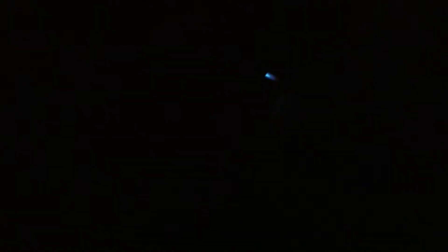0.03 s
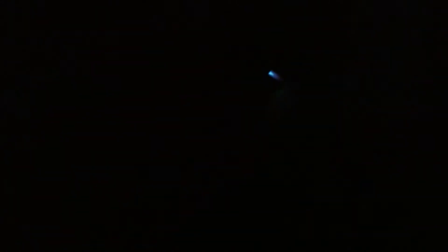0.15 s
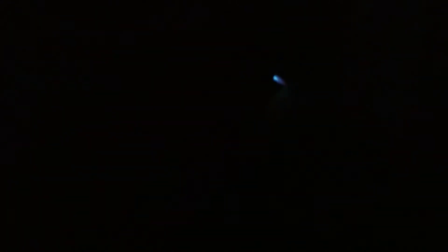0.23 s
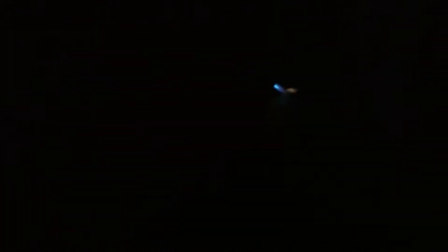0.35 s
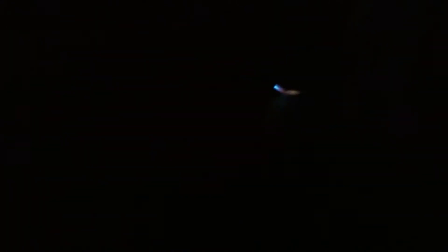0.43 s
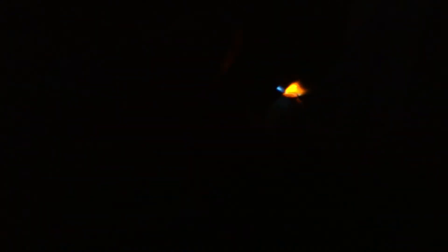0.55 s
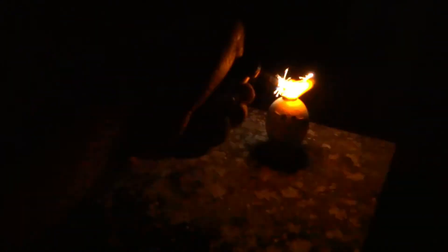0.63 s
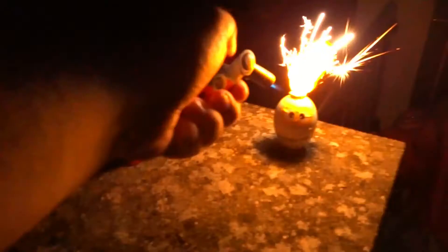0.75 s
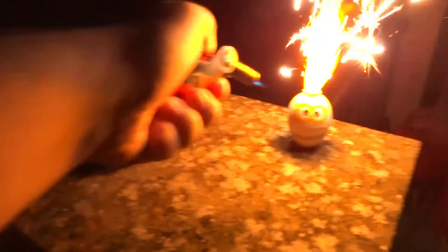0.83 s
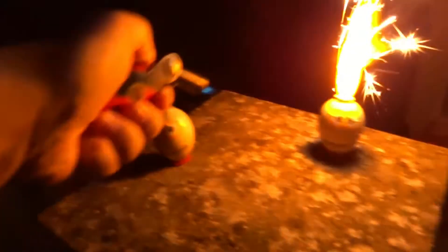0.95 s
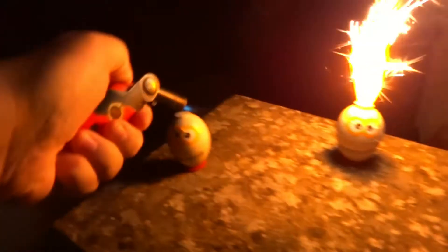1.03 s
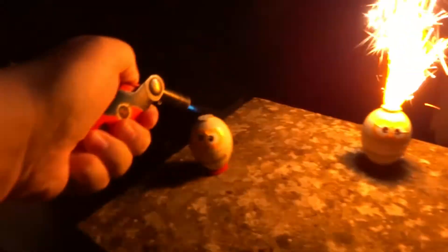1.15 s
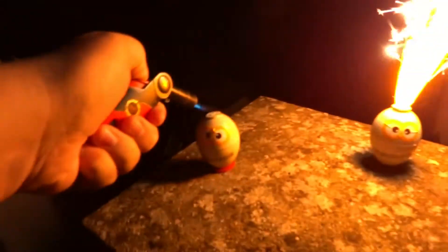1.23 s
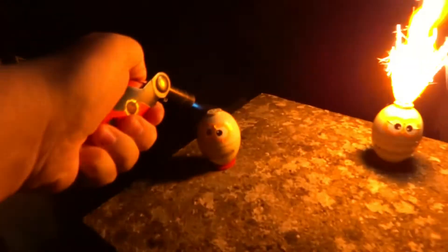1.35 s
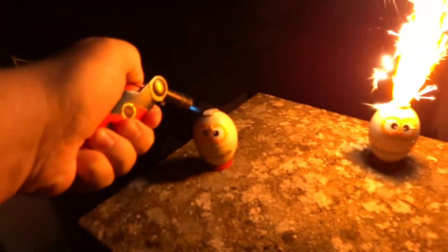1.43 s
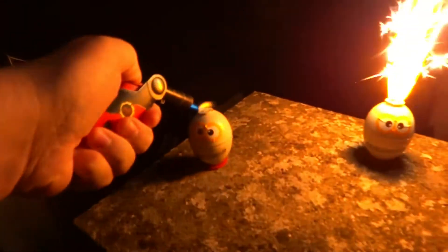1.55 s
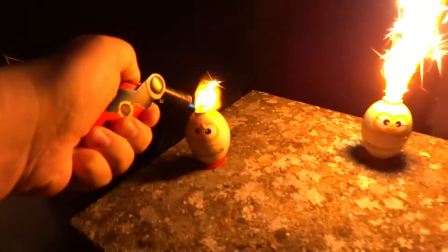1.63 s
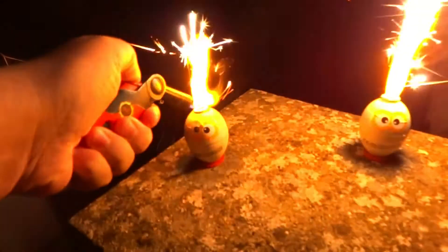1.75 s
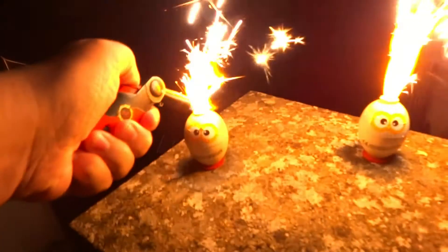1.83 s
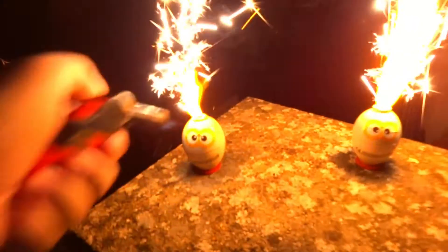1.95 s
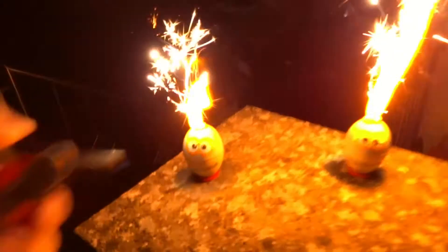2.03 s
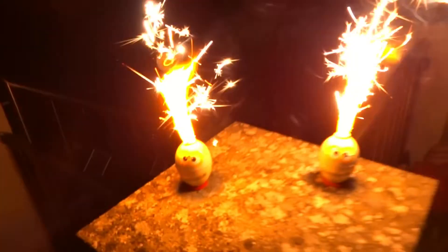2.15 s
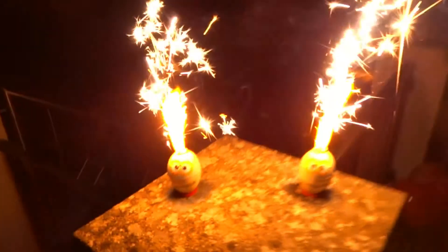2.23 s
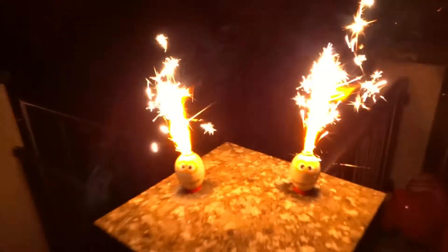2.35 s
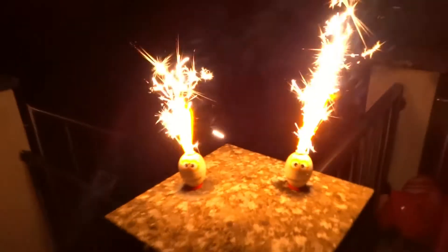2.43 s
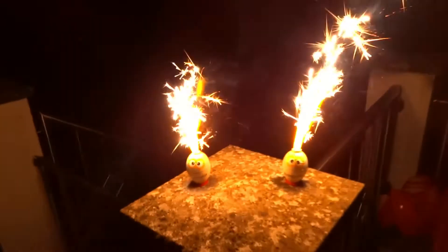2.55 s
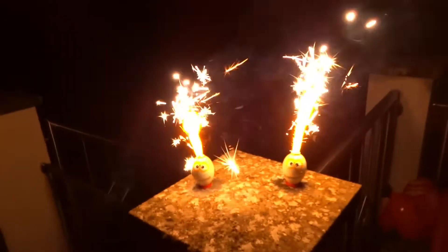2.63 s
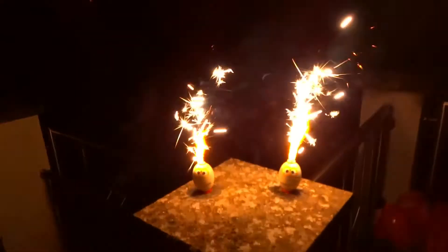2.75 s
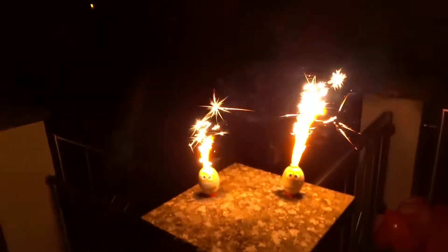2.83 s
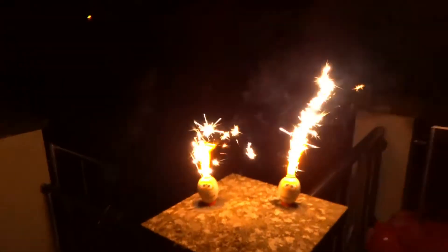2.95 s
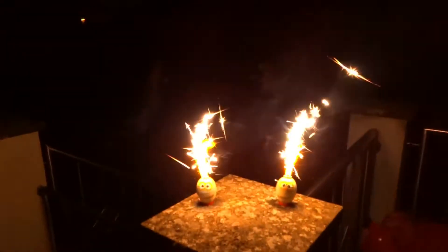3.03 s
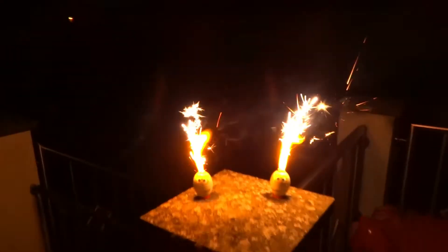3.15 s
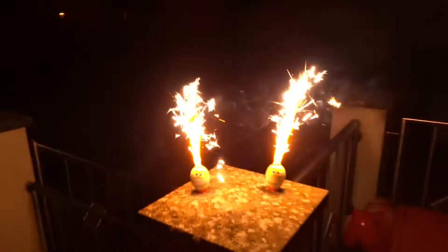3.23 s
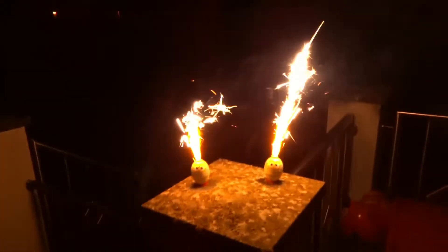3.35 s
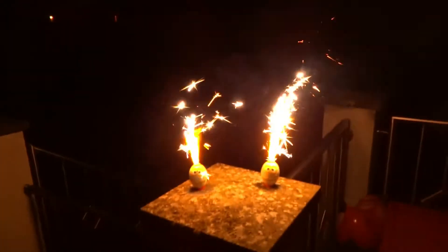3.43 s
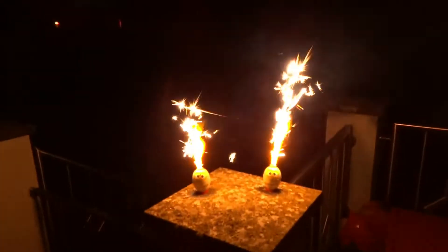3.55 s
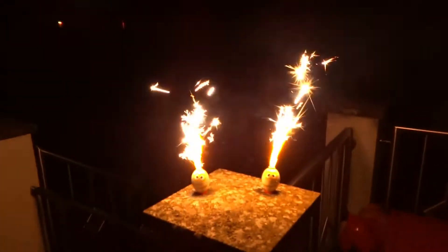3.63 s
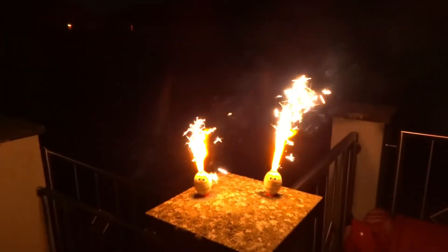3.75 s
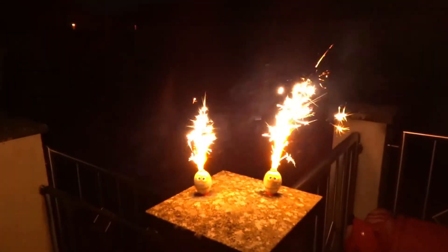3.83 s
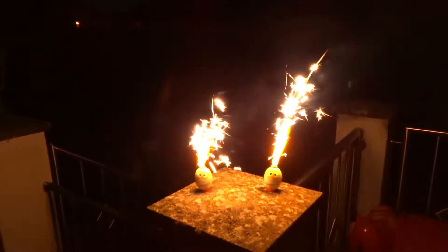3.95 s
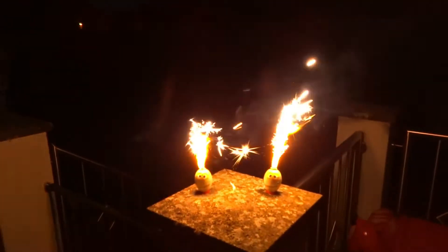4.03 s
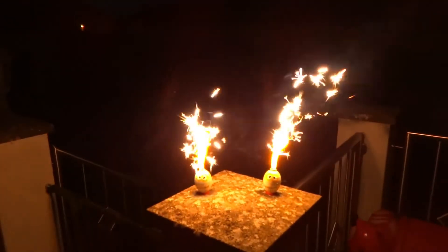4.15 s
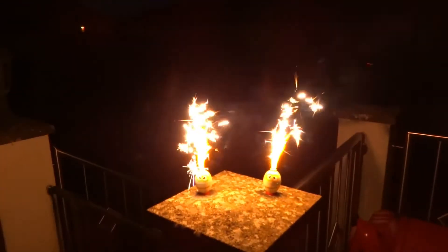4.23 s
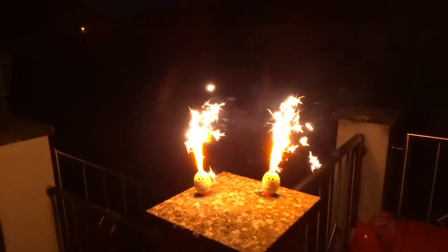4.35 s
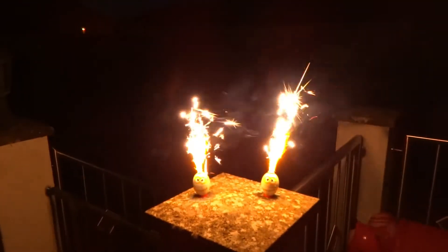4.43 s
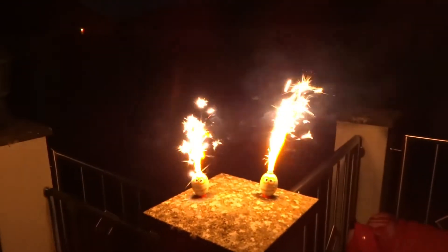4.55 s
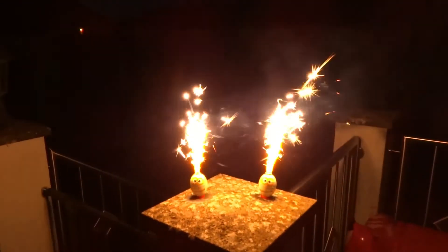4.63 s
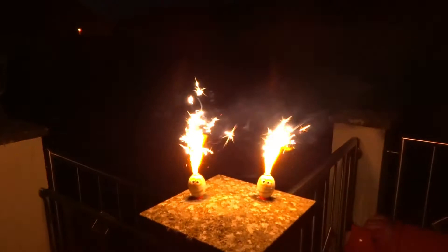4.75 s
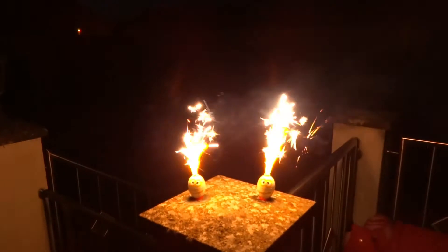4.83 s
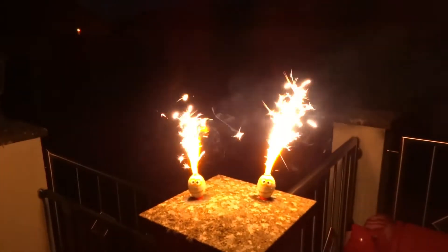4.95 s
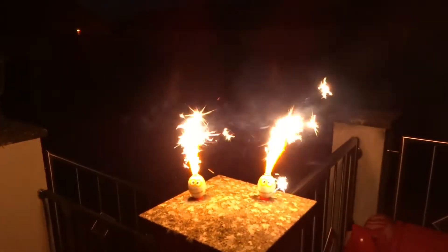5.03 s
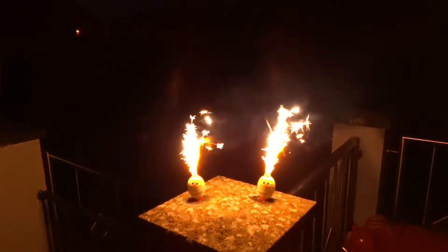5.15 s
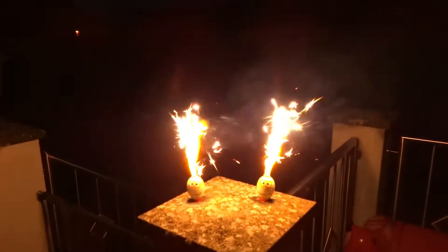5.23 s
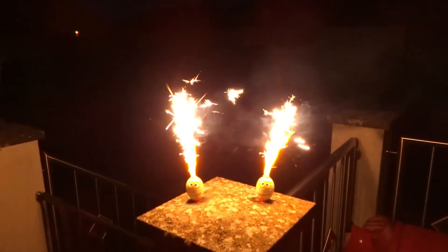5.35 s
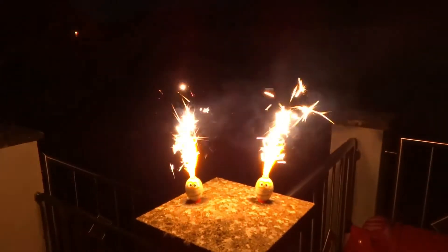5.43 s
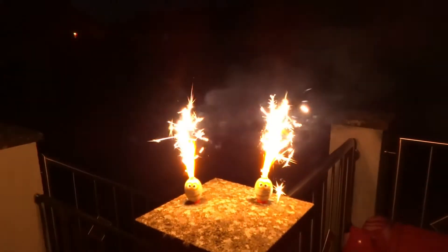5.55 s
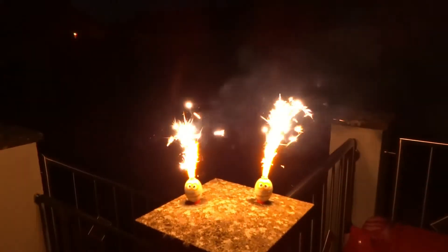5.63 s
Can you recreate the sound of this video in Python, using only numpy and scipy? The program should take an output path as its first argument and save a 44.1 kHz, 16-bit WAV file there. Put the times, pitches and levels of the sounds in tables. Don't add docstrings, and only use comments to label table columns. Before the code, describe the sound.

Quiet torch hiss, a quick fuse whoosh, then fierce sizzling spark jets that crackle and snap steadily until the end.

```python
import sys
import numpy as np
from scipy import signal
from scipy.fft import rfft, irfft, next_fast_len
from scipy.io import wavfile
from scipy.ndimage import map_coordinates

SR = 44100
rng = np.random.default_rng(int(sys.argv[2]) if len(sys.argv) > 2 else 0)


def gain_from_decibels(decibels):
    exponent = np.asarray(decibels, float) / 20
    return 10 ** exponent


def wav_out(sig):
    wavfile.write(sys.argv[1], SR, np.round(np.clip(np.atleast_2d(sig).T, -1, 1) * 32767).astype(np.int16))


N = 251370


def unit(x):
    return x / np.sqrt(np.mean(x ** 2) + 1e-20)


def in_time(rows):
    s, *columns = np.transpose(rows)
    return [np.interp(np.arange(N) / SR, s, column) for column in columns]


def coloured(x, spectrum):
    size = next_fast_len(N + 4096)
    hz = np.maximum(np.arange(size // 2 + 1) * SR / size, 1)
    table_hz, table_db = np.transpose(spectrum)
    log_gain = np.interp(np.log(hz), np.log(table_hz), table_db) * np.log(10) / 20
    cepstrum = irfft(log_gain, size)
    cepstrum[1:size // 2] *= 2
    cepstrum[size // 2 + 1:] = 0
    response = np.exp(rfft(cepstrum))
    return irfft(rfft(x, size) * response, size)[..., :N]


def drift(rate_hz):
    r = np.exp(-2 * np.pi * rate_hz / SR)
    wander = signal.lfilter([1], [1, -2 * r, r * r], rng.standard_normal(N + SR))
    return unit(wander[SR:])


def panned(x, pan_db):
    return x * gain_from_decibels(np.array([[.5], [-.5]]) * pan_db)


def bumps(s, half_s):
    return np.exp(-.5 * ((np.arange(N) / SR - s[:, None]) / half_s[:, None]) ** 2)


PART_EDGES_HZ = (30000, 11000, 6000, 1200, 1)


def band(x, index):
    hz = np.maximum(np.fft.rfftfreq(N, 1 / SR), 1)
    upper, lower = (1 / (1 + (hz / edge_hz) ** 6) for edge_hz in PART_EDGES_HZ[index:index + 2])
    return irfft(rfft(x) * (upper - lower), N)


# (time [s], hiss level [dB], flame roar level [dB], echo delay off the hand [ms])
TORCH_MOVES = [(0, -47.5, -55, .345), (.1, -48, -56.5, 0.31), (.2, -49, -54.5, .3), (.3, -47.5, -53, 0.292),
               (.45, -47, -53.5, 0.297), (.6, -44, -52, 0.285), (.8, -49, -53, 0.3), (1.9, -47, -82, 0.14),
               (2.2, -58, -57, 0.24)]
# (frequency [Hz], level per Hz [dB])
TORCH_HISS_COLOUR = [(1200, -29), (2200, -9.5), (3500, -15), (5000, -20), (7500, -23.5), (10000, -6.5),
                     (13400, 3.5), (14600, -10), (15900, -13)]
# (frequency [Hz], level per Hz [dB])
TORCH_ROAR_COLOUR = [(35, -58), (260, -18.5), (425, -17), (590, -3.5), (710, -1), (1100, -11), (1700, -18),
                     (4000, -29.5)]


def torch():
    hiss_db, roar_db, echo_ms = in_time(TORCH_MOVES)
    white = rng.standard_normal((4, N))
    gas = coloured(white[0], TORCH_HISS_COLOUR)
    echo = map_coordinates(gas, [np.arange(N) - echo_ms * SR / 1000], order=3, mode="nearest")
    hiss = gain_from_decibels(hiss_db + .8 * drift(20)) * unit(gas + .72 * echo)
    roar = gain_from_decibels(roar_db + 1.24 * drift(14)) * unit(coloured(white[1], TORCH_ROAR_COLOUR))
    spill_colour = [(1200, -7), (2500, 0), (4200, -4), (5200, -38)]
    spill = gain_from_decibels(hiss_db - 23) * unit(coloured(white[2], spill_colour))
    wide_roar = gain_from_decibels(roar_db - 11) * unit(coloured(white[3], TORCH_ROAR_COLOUR))
    return hiss + roar + (spill + wide_roar) * [[1], [-1]]


BURN_AND_FACING = [(.7, -14.5, -8), (.73, -12, -8), (.76, -3, -1), (.82, -1, -2), (1.1, 1.5, -9),
                   (1.5, 1.5, -16), (1.75, 2, -8), (2.0, 3, -4), (2.5, 2.5, -0.5), (2.9, 0.5, 0.5),
                   (3.5, -.5, 0), (4.2, -1, 0.5), (5.0, 0.5, 1.5), (5.7, -.5, 1.5)]
# (time [s], level [dB], half length [s])
SURGES_AND_LULLS = [(0.944, -3, .03), (1.032, 1.5, .04), (1.2, -3, .03), (1.35, -2.5, .04),
                    (1.62, 1.5, .04), (1.78, -2.5, .03), (1.93, 2.5, .05), (2.08, -3, .03),
                    (2.281, -1.5, .03), (2.527, 2.5, .05), (2.739, 2.5, .03), (2.809, -3, .03),
                    (3.052, 1.5, .03), (3.13, -5.5, .04), (3.28, 1.5, .06), (3.581, -2.5, .04),
                    (3.79, -1.5, .03), (3.891, 3, .04), (3.986, -2.5, .03), (4.181, -1.5, .05),
                    (4.567, 3, .06), (4.75, -3, .04), (4.897, 3.5, .05), (5.166, -3, .04), (5.31, 4, .05),
                    (5.481, -2, .04), (5.6, 1.5, .05)]


def vigour():
    burn_db, facing_db = in_time(BURN_AND_FACING)
    s, db, half_s = np.transpose(SURGES_AND_LULLS)
    return burn_db, db @ bumps(s, half_s), facing_db


# (time [s], first fountain left-right [dB],
# second fountain left-right [dB], second fountain's share [0-1], nearness [dB])
FOUNTAIN_BEARINGS = [(.6, -1, -5, 0.01, 1), (.9, -1.8, -4, 0.01, 0), (1.0, -2.5, -5, 0.09, -6),
                     (1.3, -3, -6, 0, -0.5), (1.75, -3, 4, 0, -2), (1.85, -2.5, -1.5, 0, 3),
                     (2.5, -3, 0, 0.7, -3.5), (3.5, -2, 0.2, 0.73, -9), (5.7, -1, 0, 0.5, -5)]


def bearings():
    return in_time(FOUNTAIN_BEARINGS)


def crackle(per_s, spread_db, most_db):
    born = rng.random(N) < per_s * gain_from_decibels(3.0 * drift(25)) / SR
    size = gain_from_decibels(np.minimum(spread_db * rng.exponential(1, N), most_db))
    push = rng.choice([1, -1], N, p=[.8, .2])
    return unit(born * size * push)


# (frequency [Hz], level per Hz [dB])
JET_SPECTRUM = [(40, -56), (150, -27.5), (310, -17.5), (410, -17), (650, -6.5), (950, -11), (1600, -8),
                (3100, -4), (5500, -7.5), (8000, -4.5), (11000, 1), (13600, 2.5), (14600, -6), (16000, -13)]
# (frequency [Hz], side over mid level [dB])
SURROUNDINGS = [(60, -8), (110, -11), (200, -15), (380, -16), (700, -19), (1290, -19), (2380, -20),
                (4400, -19), (8120, -25), (15000, -26)]
# (level [dB], share of burn [dB/dB], of surge [dB/dB], of facing [dB/dB])
JET_PARTS = [
    (-34.5, 0.76, 0.67, 0.74),
    (-33.5, 0.81, 0.43, -0.12),
    (-35, 1.08, 0.37, -0.0051),
    (-44, 1.03, 0.33, -0.0038),
]


def jets():
    first_db, second_db, second_share, _ = bearings()
    parts = np.zeros((3, 2, N))
    for pan_db, share in ((first_db, 1 - second_share), (second_db, second_share)):
        gas = rng.standard_normal(N) * gain_from_decibels(.9 * drift(14))
        coarse = crackle(per_s=600., spread_db=5.5, most_db=15.)
        fine = crackle(per_s=1300., spread_db=5., most_db=19.)
        bright_mix = 0.48 * gas + 0.15 * coarse + 0.9 * fine
        middle_mix = 0.48 * gas + .5 * coarse + 0.2 * fine
        low_mix = 1.14 * gas + 0.51 * coarse
        for k, mix in enumerate((bright_mix, middle_mix, low_mix)):
            parts[k] += panned(mix * np.sqrt(np.clip(share, 0, 1)), pan_db)
    bright, middle, low = coloured(parts, JET_SPECTRUM)
    scattered = coloured(coloured(rng.standard_normal(N), JET_SPECTRUM), SURROUNDINGS)
    surroundings = gain_from_decibels(-1.5) * scattered * [[1], [-1]]
    controls_db = np.array(vigour())
    jet = 0
    for k, (part, (level_db, *shares)) in enumerate(zip((bright, bright, middle, low), JET_PARTS)):
        jet = jet + gain_from_decibels(level_db + shares @ controls_db) * unit(band(part + surroundings, k))
    catching = np.clip((np.arange(N) / SR - .59) / 0.14, 0, 1) ** 0.82
    return catching * jet


# (time [s], snap peak level [dB], body peak level [dB])
FIRST_SPUTTERS = [(0.6424, -27, -32), (0.6583, -27, -36), (0.6704, -21, -23), (0.6864, -27, -27),
                  (0.7204, -26, -28), (0.729, -18, -31), (0.7445, -20, -24), (0.7569, -15, -23),
                  (0.7666, -20, -26), (0.7771, -10, -27), (0.7907, -10, -30), (0.7992, -22, -25)]
# (time [s], snap peak level [dB], body peak level [dB])
CLOSE_BURSTS = [(0.8865, -12, -16), (0.9336, -7, -12), (0.9851, -9, -11), (1.0222, -12, -14),
                (1.0639, -12, -11), (1.127, -15, -16), (1.1747, -9, -12), (1.2352, -7, -10),
                (1.3935, -13, -12), (1.4458, -15, -15), (1.4873, -10, -12), (1.5116, -7, -14),
                (1.5556, -18, -15), (1.5947, -8, -15), (1.6207, -11, -15), (1.7137, -11, -14),
                (1.7818, -6, -16), (1.8053, -9, -14), (1.8363, -14, -15), (1.93, -13, -16),
                (2.03, -26, -16), (2.0548, -7, -8), (2.2052, -8, -10), (2.2641, -7, -10), (2.3419, -5, -16),
                (2.4024, -9, -16), (2.5778, -4, -12), (2.6258, -6, -15), (2.7012, -11, -11),
                (2.721, -7, -15)]
# (time [s], snap peak level [dB], body peak level [dB])
BACKED_OFF_BURSTS = [(2.7855, -7, -12), (2.8061, -14, -8), (2.8455, -11, -14), (2.885, -19, -15),
                     (2.8921, -11, -14), (3.1462, -5, -11), (3.1538, -16, -15), (3.4017, -8, -11),
                     (3.6392, -16, -12), (3.6486, -13, -11), (3.7301, -6, -16), (3.7998, -7, -15),
                     (3.909, -12, -16), (3.9785, -9, -14), (4.0603, -7, -14), (4.211, -19, -14),
                     (4.2922, -6, -15), (4.3105, -14, -16), (4.4187, -9, -16), (4.4582, -6, -13),
                     (4.5576, -13, -12), (4.5974, -7, -15), (4.6113, -18, -14), (4.6405, -14, -15),
                     (4.649, -11, -8), (4.6646, -6, -14), (5.0093, -6, -11), (5.0552, -9, -12),
                     (5.0623, -12, -15), (5.1098, -10, -15)]
# (time [s], snap peak level [dB])
BRIGHT_SNAPS = [(0.8429, -7), (0.8532, -7), (1.9357, -7), (2.4387, -6), (2.6892, -6), (2.9401, -7),
                (2.9654, -7), (3.0978, -5), (3.5226, -6), (3.557, -7), (3.7126, -6), (3.7195, -5),
                (3.7699, -7), (3.9851, -6), (4.2662, -6), (4.2954, -6), (4.4053, -6), (4.5801, -6),
                (4.7168, -7), (4.9242, -7), (4.975, -7), (5.1359, -6), (5.343, -7), (5.3725, -6),
                (5.3805, -6), (5.3886, -7), (5.4168, -7), (5.46, -6), (5.482, -6), (5.578, -5)]


def burst_rows():
    stray_count = 125
    burn_db, surge_db, facing_db = vigour()
    rate = gain_from_decibels(burn_db + 1.8 * surge_db + .6 * facing_db) * (np.arange(N) > .77 * SR)
    when, size = rng.random(stray_count), rng.standard_normal(stray_count)
    stray_s = np.interp(when, np.cumsum(rate) / rate.sum(), np.arange(N) / SR)
    stray_db = -9.5 + 2 * size
    thin = np.vstack([BRIGHT_SNAPS, np.transpose([stray_s, stray_db])])
    thin_body_db = -27 + 5 * np.clip(rng.standard_normal(len(thin)), -2, 2)
    thin_rows = np.column_stack([thin, thin_body_db])
    return np.vstack([FIRST_SPUTTERS, CLOSE_BURSTS, BACKED_OFF_BURSTS, thin_rows])


# (least delay [ms], most delay [ms], level [dB])
TABLE_AND_RAILING = [(.3, 1.0, -10), (1.2, 2.0, -11), (2.5, 4.5, -17)]


def echoed(at, sizes):
    out = np.zeros((2, N + SR))
    place = rng.random((len(at), len(TABLE_AND_RAILING)))
    out[:, at] = sizes
    for where, (least_ms, most_ms, level_db) in zip(place.T, TABLE_AND_RAILING):
        delay_ms = least_ms + where * (most_ms - least_ms)
        out[:, at + (delay_ms * SR / 1000).astype(int)] += sizes * gain_from_decibels(level_db)
    return out[:, :N]


def pulse_of(x):
    return x[:512] / np.abs(signal.hilbert(x[:512])).max()


def pops():
    s, snap_db, body_db = burst_rows().T
    at = np.round(s * SR).astype(int) - 2
    first_db, second_db, share, near_db = (curve[at] for curve in bearings())
    pan_db = np.where(rng.random(len(s)) < share, second_db, first_db)
    pan_db = pan_db + 1.1 * rng.standard_normal(len(s))
    snaps = echoed(at, panned(gain_from_decibels(snap_db + .3), pan_db))
    bodies = echoed(at, panned(gain_from_decibels(body_db + 2.5), pan_db))
    lead = 64
    step = coloured(np.arange(N) == lead, JET_SPECTRUM)
    snap = pulse_of(band(step, index=0) + band(step, index=1))
    push = pulse_of(band(step, index=2) + 1.6 * band(step, index=3))
    burst = signal.fftconvolve(snaps, [snap]) + signal.fftconvolve(bodies, [push])
    thuds = np.zeros(N)
    thuds[at] = gain_from_decibels(body_db + near_db - 26)
    thud = signal.lfilter([1], [1, -np.exp(-1 / SR / 0.00068)], thuds)
    return burst[:, lead:N + lead] + thud


def flare(puffs, colour):
    s, db, half_s = np.transpose(puffs)
    swell = gain_from_decibels(db) @ bumps(s, half_s)
    return swell * gain_from_decibels(0.98 * drift(60)) * unit(coloured(rng.standard_normal(N), colour))


# (time [s], level [dB], half length [s])
FIRST_FUSE_PUFFS = [
    (.645, -53, .01),
    (.68, -49, 0.012),
    (.735, -43, 0.017),
    (.8, -37.5, 0.046),
]
# (frequency [Hz], level per Hz [dB])
NOZZLE_RING = [(1500, -33), (2300, -5), (3300, 1), (4100, -4), (4900, -29)]


def first_fuse():
    return flare(FIRST_FUSE_PUFFS, NOZZLE_RING)


# (time [s], level [dB], half length [s])
SECOND_FUSE_PUFFS = [
    (1.558, -36, .008),
    (1.582, -31.5, .011),
    (1.608, -39, .008),
    (1.643, -34.5, .016),
    (1.64, -44, .09),
]
# (frequency [Hz], level per Hz [dB])
WHOOSH_COLOUR = [(60, -35), (150, -8.5), (200, -16), (310, -1.5), (440, -11), (600, 4), (800, -9),
                 (1050, -4.5), (1600, -12), (2600, -25), (5000, -48)]


def second_fuse():
    return flare(SECOND_FUSE_PUFFS, WHOOSH_COLOUR)


def scene():
    return torch() + first_fuse() + jets() + pops() + second_fuse()


def low_pass(x):
    return signal.sosfilt(signal.butter(12, 15880, fs=SR, output="sos"), x)


def record(dry):
    x = signal.sosfilt(signal.butter(1, 70, "high", fs=SR, output="sos"), dry)
    x = np.real(signal.hilbert(x) * np.exp(-1j * 2.0))
    over_db = np.maximum(20 * np.log10(np.abs(x).max(axis=0) + 1e-9) + 5.5, 0)
    ramp_db = 100.0 * np.arange(N) / SR
    held_db = np.maximum.accumulate(over_db + ramp_db) - ramp_db
    duck_db = signal.lfilter([.01], [1, -.99], held_db)
    x = x * gain_from_decibels(-.65 * duck_db)
    x = signal.sosfiltfilt(signal.cheby2(16, 30, 15920, fs=SR, output="sos"), x)
    return low_pass(x)


dry = scene()
out = record(dry)
wav_out(out)
```